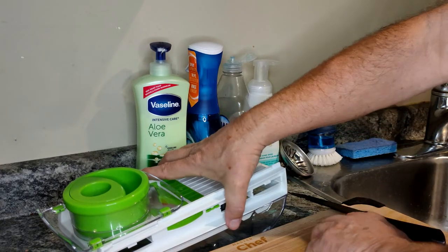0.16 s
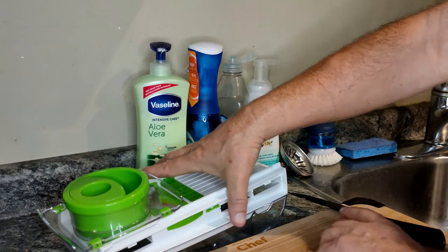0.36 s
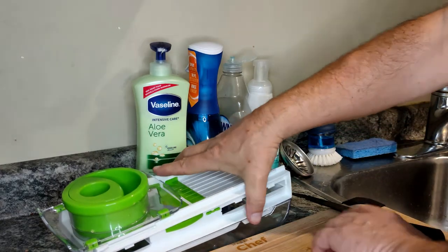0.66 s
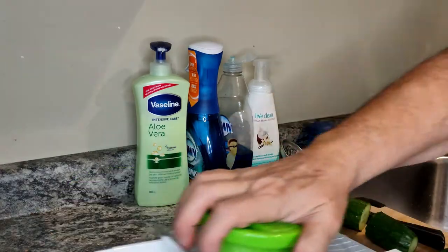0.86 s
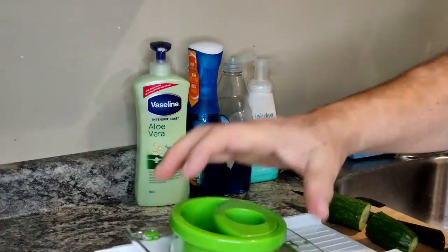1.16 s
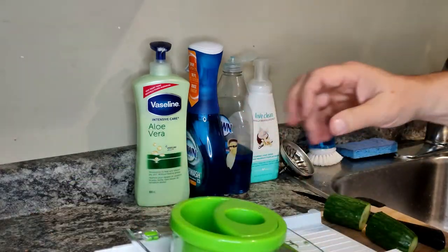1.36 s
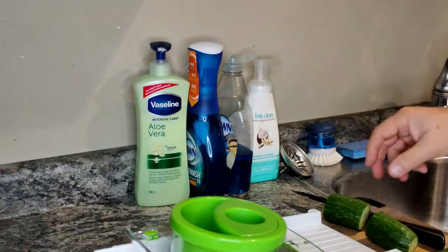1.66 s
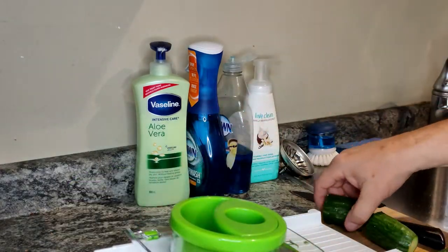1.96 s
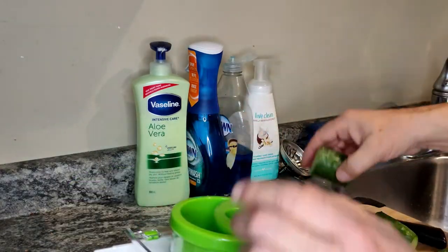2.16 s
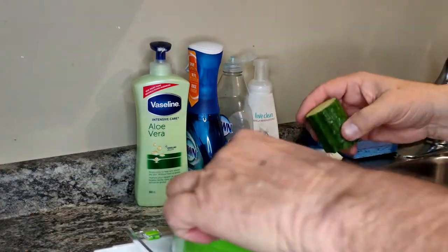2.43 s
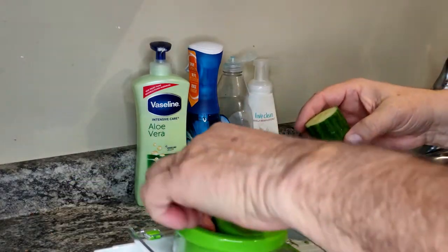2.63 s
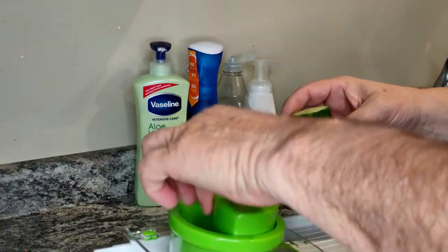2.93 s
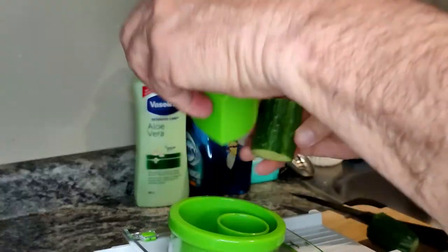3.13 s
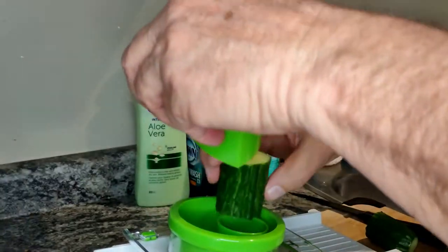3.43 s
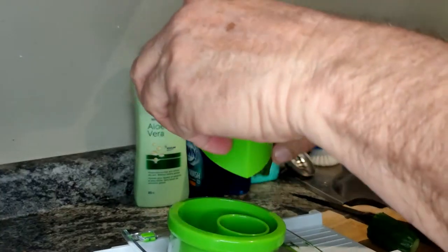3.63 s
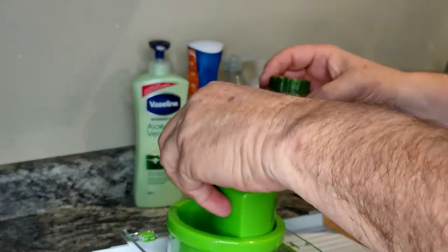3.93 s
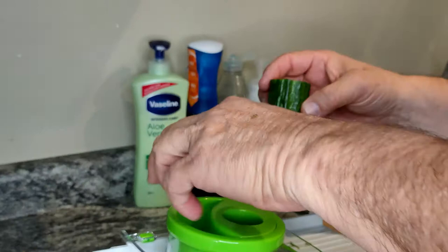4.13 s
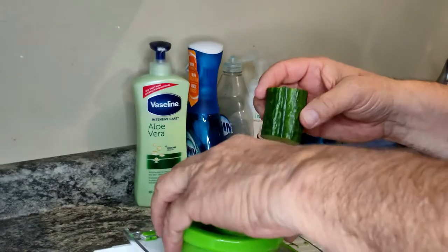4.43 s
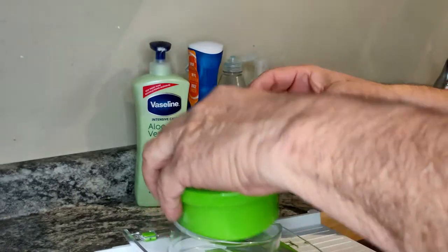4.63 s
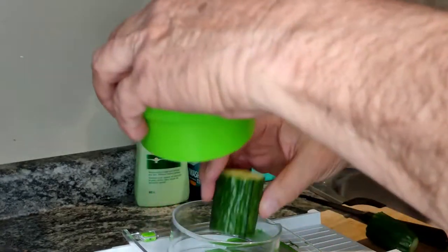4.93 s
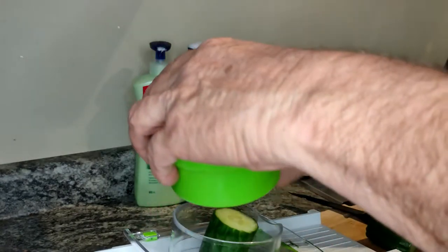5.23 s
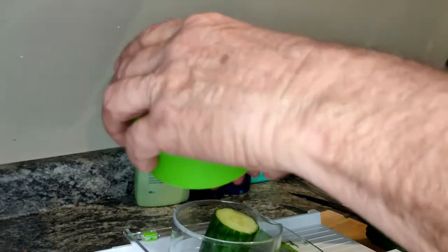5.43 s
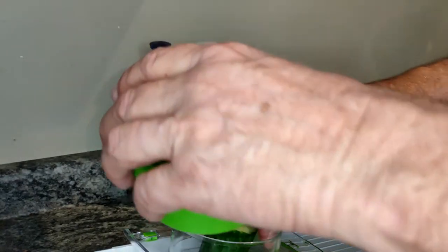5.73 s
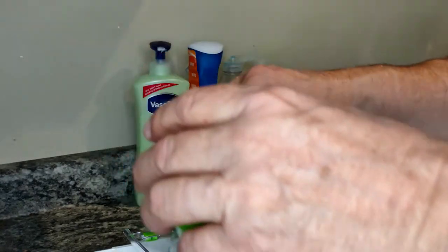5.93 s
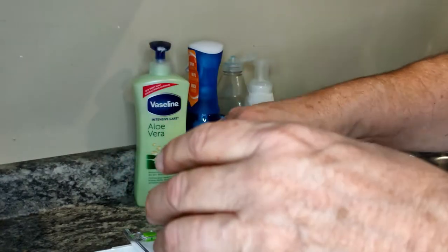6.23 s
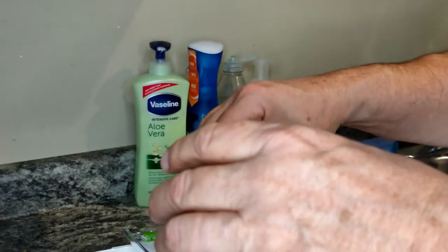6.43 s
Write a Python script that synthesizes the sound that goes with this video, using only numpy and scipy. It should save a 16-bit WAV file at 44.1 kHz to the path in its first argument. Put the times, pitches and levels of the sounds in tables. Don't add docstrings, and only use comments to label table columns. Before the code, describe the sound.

Hands set a plastic slicer on a stone kitchen counter with chattering knocks, then hollow plastic clatters and clicks over a faint refrigerator hum.

```python
import sys
import numpy as np
from scipy import signal
from scipy.fft import rfft, irfft, next_fast_len
from scipy.io import wavfile
from scipy.ndimage import uniform_filter1d

SR = 44100
rng = np.random.default_rng(int(sys.argv[2]) if len(sys.argv) > 2 else 0)


def dump(signal):
    limited = np.clip(np.atleast_2d(signal).T, -1, 1)
    pcm = np.round(limited * 32767).astype(np.int16)
    wavfile.write(sys.argv[1], SR, pcm)


def how_loud(loudness_db):
    steps = np.asarray(loudness_db, float) / 20
    return 10 ** steps


N = 290178

# motor_multiple, level_db
HUM = [(4, -84.5), (5, -58.5), (6, -57.5), (7, -65), (9, -83.5), (10, -77), (16, -79)]
MOTOR_HZ = 59.13
# pitch_hz, width_hz, level_db
WHINES = [(230.3, 11, -66.5), (1670, 30, -90.5), (2200, 8, -85.5), (4199, 1.5, -76)]
# freq_hz, level_db_per_hz
AIR = [(15, -58.5), (25, -40), (144, -11.5), (246, -6), (354, -4), (474, -4.5), (1110, -21), (1190, -34),
       (3740, -30), (4130, -26), (4890, -39.5), (6710, -31), (7580, -31.5), (8350, -63.5), (10900, -86),
       (18400, -120)]
AIR_DB = -61.5
# freq_hz, t60_s
KITCHEN = [(100, 0.23), (400, 0.46), (1000, 0.52), (3000, 0.47), (8000, 0.36)]

# time_s, speed_db, weight_on_plastic_db
HAND_MOVES = [(0.0, -54.5, 13.5), (0.18, -53, -6), (0.42, -62, -0.5), (0.62, -57, -1), (0.95, -39.5, 2.5),
              (1.37, -60, 4.5), (1.55, -62, -1), (1.8, -55.5, 0), (2.35, -65.5, 0.5), (2.78, -58, 4),
              (3.4, -58.5, -5), (4.0, -63, 0.5), (4.2, -49, 0), (4.58, -56, -3.5), (5.06, -53, -2),
              (5.38, -61, 0), (5.74, -60, -0.5), (6.2, -67.5, 3)]
# freq_hz, level_db_per_hz
SKIN = [(2060, -43), (3500, -15.5), (4050, -12.5), (5200, -11), (6550, -2.5), (7610, -13), (8200, -28),
        (10700, -57), (18000, -120)]
# freq_hz, level_db_per_hz
SCRAPE = [(290, -22), (500, -0.5), (919, -3.5), (994, 0), (1410, -5), (2250, -9.5), (2800, -12),
          (4000, -21), (5200, -39.5), (8800, -120)]
# start_s, length_s, level_db
BRUSHES = [(0.088, 0.052, -58.5), (0.517, 0.023, -64), (5.004, 0.21, -67), (5.484, 0.25, -61),
           (6.563, .06, -65.5)]
BRUSH_EDGE_S = 0.024
# pitch_hz, width_hz, level_db
RUB_RINGS = [(1440, 190, -62), (2190, 110, -66.5)]
RUB_S, RUB_HALF_S = 5.06, 0.23
RUMBLE_DB, RUMBLE_FOLLOWS = -64.5, 0.66
RATTLE_DB, RATTLE_S, SHAKE_DB, SHAKE_S = -17, 0.016, -7, 0.018

# crest_s, peak_db, pitch_hz
THUMPS = [(0.25, -44.5, 92.8), (0.611, -45.5, 126.7), (0.755, -21, 95), (0.811, -23, 104),
          (0.883, -38, 93.6), (0.946, -36, 95), (0.997, -27, 100), (1.056, -35, 160), (1.15, -41, 162),
          (1.291, -43, 133), (1.678, -38, 131), (1.742, -37, 84), (1.025, -31, 155), (2.146, -34, 104),
          (2.185, -38, 135), (2.683, -45, 150), (2.871, -42.5, 152), (3.062, -34.5, 133),
          (3.122, -33.5, 142.6), (3.475, -31, 143.4), (4.69, -41, 215), (4.084, -35, 95), (4.058, -29, 128),
          (4.122, -32, 140), (4.269, -32.5, 141.8), (4.297, -37, 145), (4.537, -40.5, 118),
          (4.655, -38, 145), (4.756, -38, 135), (5.186, -48, 162), (0.2, -40.5, 86), (0.8, -37.5, 187.5),
          (1.19, -36, 158), (0.842, -33, 91), (4.045, -36, 215), (3.093, -36, 131)]
# crest_s, peak_db
JOLTS = [(0.351, -42), (0.759, -46), (1.3, -51), (1.759, -46), (2.061, -46), (3.479, -44), (2.26, -48),
         (5.36, -46), (6.26, -54)]
JOLT_HZ = 61
# crest_s, peak_db
CAVITY_BOOMS = [(0.817, -28), (0.797, -23), (0.842, -34), (0.879, -39), (1.722, -31), (1.793, -33),
                (1.825, -32), (5.17, -50), (3.062, -21), (3.133, -33), (3.167, -38.5), (3.47, -28.5),
                (3.493, -32), (4.035, -20.5), (4.066, -26), (3.079, -27), (4.126, -26.5), (4.258, -31),
                (4.297, -24), (4.645, -35), (4.664, -34.5), (4.773, -24), (2.612, -43), (2.68, -40),
                (3.053, -27.5), (3.112, -41.5), (3.533, -40.5), (4.756, -29), (4.835, -44), (4.705, -40),
                (4.228, -33), (4.281, -23), (4.11, -36.5)]
CAVITY_HZ = 584
CAVITY_SWELL_S, THUMP_SWELL_S = 0.011, 0.01325

# start_s, level_db, hardness_db (body to edges), fade_s
FRAME_KNOCKS = [(0.11, -45, 3, 0.02), (0.203, -50, 8.5, 0.015), (0.331, -53.5, -9, 0.011),
                (0.6, -58, -8, 0.032), (0.744, -29, 2, 0.018), (0.7895, -22.5, 2.5, 0.011),
                (0.7975, -18.5, 1.5, 0.0089), (0.813, -35, -8, .014), (0.84, -59.5, -1, 0.021),
                (0.93, -39.5, 0, 0.024), (0.984, -22, 5.5, 0.013), (1.02, -34.5, 0.5, 0.07),
                (1.05, -40.5, 1.5, 0.0084), (1.115, -36.5, 2.5, 0.011), (1.175, -38, 4, 0.011),
                (1.205, -32.5, 3.5, 0.016), (0.99, -35.5, 1, 0.0095), (1.243, -36.5, 0.5, 0.009),
                (1.252, -34.5, 8, 0.0078)]
# start_s, level_db, hardness_db, fade_s
BOARD_KNOCKS = [(1.645, -41.5, -1, 0.014), (1.669, -37.5, -4, 0.012), (1.7095, -33.5, -3, 0.011),
                (1.719, -35, 5, 0.016), (1.784, -37, -1, 0.014), (1.816, -35.5, -5, 0.01),
                (1.931, -49, 7.5, 0.0073), (2.036, -56, 5, 0.059), (2.111, -36, -9.5, 0.004),
                (2.121, -42, -8, 0.024), (2.59, -58.5, -10, 0.019), (2.66, -45, 3.5, 0.015),
                (2.783, -67.5, -6, 0.035), (2.806, -58.5, -13, 0.0033), (2.861, -47, -1, 0.017),
                (3.0468, -27, -0.5, 0.021), (3.057, -47.5, -10, 0.022), (3.084, -32, 8, 0.009),
                (3.09, -29, -1, 0.014), (3.116, -46, -2, 0.024), (3.164, -47.5, -9.5, 0.0065)]
# start_s, level_db, hardness_db, fade_s
CUP_KNOCKS = [(3.456, -26.5, 3.5, 0.012), (3.463, -38.5, -3, 0.046), (4.004, -28.5, 2, 0.017),
              (4.0305, -22, 3, 0.017), (4.045, -36.5, 7.5, 0.0022), (4.056, -31, 4.5, 0.018),
              (4.075, -36, 0.5, 0.013), (4.175, -50, 8.5, 0.024), (4.218, -40, 4.5, 0.067),
              (4.252, -30, 6, 0.016), (4.262, -23, 4, 0.014), (4.302, -48, 6, .014),
              (4.449, -52, 14.5, 0.009), (4.5165, -47, 6, 0.009), (4.638, -39.5, -4, 0.011),
              (4.662, -41.5, -1.5, 0.036), (4.745, -33, 0, 0.016), (5.162, -52, 6, 0.014),
              (5.889, -60, -1, 0.0096), (5.95, -59.5, -4, 0.015), (6.523, -67, -11, 0.0045)]
# start_s, level_db, hardness_db, fade_s
MORE_KNOCKS = [(0.198, -55.5, -4.5, 0.013), (0.334, -50, 5, 0.013), (0.111, -44.5, 1.5, 0.0044),
               (4.4525, -52, 12, .004), (4.745, -38, -2, .003), (0.736, -35, 2, 0.02), (0.76, -38.5, -4.5, .02),
               (1.012, -37.5, 7, 0.0071), (1.08, -41.5, -3.5, .015), (2.596, -54.5, 0, 0.0064),
               (2.673, -47, -1.5, 0.012), (2.78, -57.5, -6.5, 0.0097), (3.103, -33, -0.5, 0.011),
               (3.452, -51, 3, 0.0042), (4.037, -36.5, 4, 0.016), (4.05, -26.5, 3, 0.0086),
               (4.082, -41, -1.5, .008), (4.125, -41.5, -3.5, 0.0059), (4.2165, -45, 11.5, 0.0039),
               (4.269, -30, 3, 0.0069), (4.524, -43.5, 1.5, 0.005), (4.62, -53.5, 2.5, .012),
               (6.0, -72, 3, 0.019)]
# start_s, level_db, hardness_db, fade_s
SLIDES = [(0.66, -54.5, -0.5, 0.032), (0.735, -37.5, 5, 0.1), (0.978, -41.5, 9, 0.0023),
          (1.614, -53.5, -8.5, 0.0099), (2.145, -50, -11, 0.039), (2.573, -55, -1.5, .022),
          (3.025, -48, 2.5, 0.011), (3.5, -43, 2.5, 0.04), (4.103, -32.5, 1.5, .016),
          (4.621, -49, -1.5, 0.052), (4.82, -73.5, 19, 0.0083), (6.25, -60.5, 5.5, 0.0343)]
KNOCK_RISE_S, SLIDE_RISE_S = 0.0022, 0.0072
# low_hz, high_hz
BANDS = [(500, 1500), (1500, 4000), (4000, 9000)]
# pitch_hz, width_hz, level_db
FRAME = [(830, 170, -11), (1530, 370, 12), (1950, 670, -16), (3410, 270, 0), (3590, 230, -19),
         (4920, 82, -14), (4700, 120, -13), (5200, 38, -4), (7000, 21, 0.5), (6240, 16, -2.5),
         (6600, 70, -7.5), (6610, 66, 7.5), (7050, 48, 5)]
# pitch_hz, width_hz, level_db
RAILS = [(593, 34, -2.5), (904, 68, 9), (1230, 9.2, -3.5), (1650, 370, 1), (3420, 290, -9.5),
         (5100, 50, -13), (6150, 110, -32.5), (6550, 110, 9.5), (7130, 69, -0.5), (7270, 38, -2)]
# pitch_hz, width_hz, level_db
BOARD = [(747, 130, 6.5), (1200, 83, -6), (1550, 120, -3), (3470, 89, -41), (4660, 38, -27),
         (4750, 29, -20), (5860, 105, -16), (6520, 65, -14)]
# pitch_hz, width_hz, level_db
RIM = [(1500, 320, -4), (2106, 47, -3), (3620, 680, 17.5), (5100, 130, -39), (5050, 31, 4), (6600, 90, -5),
       (6490, 100, 14), (6900, 72, -3.5), (7500, 29, -3.5), (7250, 47, -5)]
# pitch_hz, width_hz, level_db
PUSHER = [(1228, 98, -13.5), (1375, 84, 3.5), (2304, 63, -12.5), (2600, 37, -1.5), (3270, 32, -7),
          (3620, 26, -3), (3760, 150, -7.5), (5230, 87, -16), (6650, 73, -21), (6810, 38, -5)]
# pitch_hz, width_hz, level_db
CUP = [(780, 14, -4), (942, 22, -1), (1690, 340, 5.5), (2670, 220, -6.5), (3300, 36, -17), (3700, 53, -15),
       (4900, 310, -16.5), (4810, 13, -1), (5400, 58, -7), (6370, 48, 1.5), (6870, 37, 0.5), (6940, 140, 2),
       (7200, 33, -11.5)]
# pitch_hz, width_hz, level_db
LID = [(870, 170, 0), (1690, 30, -30), (2150, 240, 1.5), (3160, 420, 2), (3450, 33, -15.5), (5230, 81, 4.5),
       (6600, 86, -3), (6460, 86, -8.5), (6570, 72, 10.5), (7260, 42, 5.5)]
# from_s, part_resonances, walls_above_body_and_edges_db
STRUCK = [
    (0, FRAME, 1.5),
    (1.5, RAILS, 1.5),
    (2.1, BOARD, 2),
    (2.4, RIM, 0),
    (3.3, PUSHER, 3),
    (3.8, CUP, 3.5),
    (4.6, LID, 1),
]
# start_s, peak_db, pitch_hz, t60_s
PINGS = [(0.111, -38, 997, .03), (0.331, -35, 900, .04), (0.334, -38.5, 6700, .05), (0.668, -47, 4900, .06),
         (0.806, -23.5, 1006, .06), (0.885, -39, 1380, .04), (1.206, -26, 1820, .04),
         (1.252, -37, 4750, .02), (1.669, -31, 1585, .04), (1.71, -30, 790, .06), (1.67, -36, 800, .06),
         (1.82, -32, 1150, .05), (4.665, -33, 700, .05), (3.083, -27, 3700, .05), (5.2, -52, 620, .05),
         (1.722, -27, 6460, .04), (1.784, -27.5, 1550, .04), (2.112, -26, 744, 0.06),
         (2.112, -35, 1227, 0.069), (2.118, -47, 1570, .12), (2.152, -34, 730, 0.067),
         (2.135, -36, 620, .05), (2.165, -41, 945, .06), (2.673, -40, 1500, .05), (2.674, -39, 1710, .05),
         (2.806, -42, 1290, .02), (2.864, -41, 1177, .08), (3.023, -42, 1800, .06), (3.048, -20, 690, .05),
         (3.09, -26, 2007, .04),
         (4.2575, -20, 1800, .04), (4.268, -19, 2000, .03), (3.475, -33, 2560, .09),
             (3.456, -23, 2490, .03), (3.457, -19.5, 2190, .04), (3.465, -23.5, 690, .05),
             (3.474, -28.5, 1454, .08), (4.004, -14, 2123, .04), (4.007, -27.5, 1080, 0.078),
             (4.03, -23.5, 1060, .06), (4.052, -21.5, 966, .08), (4.08, -28.5, 1880, 0.065),
             (4.452, -36, 4900, 0.039), (4.5205, -27, 6550, 0.04), (4.8, -43, 6600, .08),
             (0.79, -25.5, 1095, .04), (0.84, -30.5, 1000, 0.058), (1.05, -38, 1500, .04),
             (3.5, -39, 2200, .1), (3.469, -42.5, 3300, 0.1), (4.004, -25, 5950, .04),
             (4.044, -22.5, 2740, .04), (4.2535, -16, 1778, .07), (4.255, -16, 4650, .035),
             (4.521, -31.5, 2050, .05), (4.528, -34.5, 650, .05), (4.64, -31, 1370, .04),
             (4.747, -28, 2150, .05), (4.76, -33, 900, .07), (4.83, -43, 680, 0.046),
             (5.889, -45.5, 960, .08), (5.889, -48, 1630, .06), (6.523, -50, 1200, .05)]
PING_RISE_S = 0.0013
# start_s, peak_db, pitch_hz
SNAPS = [(0.797, -7, 6800), (0.9843, -15, 6300), (1.1158, -24, 3000), (1.2056, -25, 2200),
         (1.7836, -23, 2000), (3.0817, -9, 6500), (3.4565, -18, 6800), (4.0304, -9, 3300),
         (4.0334, -13, 6800), (4.1037, -26, 6900), (4.2185, -28, 5950), (4.2618, -13, 3200),
         (4.2624, -10, 6700), (4.448, -22, 5600), (4.4517, -28, 5200), (4.5201, -21, 6700),
         (4.7464, -23, 6200), (5.1642, -40, 6300)]
SNAP_T60_S = 0.017

# freq_hz, level_db
MICROPHONE = [(7300, 0), (7800, -1), (8100, -7), (8500, -14.5), (9000, -46.5), (11000, -70), (16000, -85)]
# centre_s, share_dropped (0-1)
THINNED = [(0.129, .6), (.29, .5), (.94, .4), (1.145, .4), (2.05, .6), (2.564, .3), (2.63, .3), (2.755, .6),
           (2.82, .6), (3.15, .4), (3.24, .3), (3.49, .25), (1.9, .25), (3.972, .4), (4.056, .5),
           (4.685, .5), (4.725, .6), (5.71, .7), (6.0, .3), (1.29, .3), (4.37, .2), (6.19, .3), (6.264, .8),
           (6.49, .4)]


def evened(x):
    return x / np.sqrt(np.mean(x ** 2) + 1e-20)


def read(points, hz):
    f, value = np.transpose(points)
    return np.interp(np.log(hz + 1), np.log(f + 1), value)


def add(mix, s, sound):
    part = mix[round(s * SR):][:len(sound)]
    part += sound[:len(part)]


def coloured(x, points):
    size = next_fast_len(len(x))
    gain = how_loud(read(points, np.fft.rfftfreq(size, 1 / SR)))
    return evened(irfft(rfft(x, size) * gain, size)[:len(x)])


def fuzzy_line(hz, width_hz, steady):
    r = np.exp(-np.pi * abs(width_hz) / SR)
    noise = rng.standard_normal(N) + 1j * rng.standard_normal(N)
    slow = signal.lfilter([1 - r], [1, -r], noise)
    carrier = np.exp(2j * np.pi * hz * np.arange(N) / SR)
    return evened(((steady + slow / slow.std()) * carrier).real)


def swell(t, crest_s):
    return (t / crest_s * np.exp(1 - t / crest_s)) ** 1.4


def settling(x, fade_s):
    r = np.exp(-1 / (SR * fade_s))
    return np.sqrt(abs(signal.lfilter([1 - r], [1, -r], x ** 2)))


def refrigerator():
    turn = 2 * np.pi * MOTOR_HZ * np.arange(N) / SR
    waver = evened(uniform_filter1d(rng.standard_normal((len(HUM), N)), size=6000, axis=1))
    sound = how_loud(AIR_DB) * coloured(rng.standard_normal(N), AIR)
    for (multiple, db), w in zip(HUM, waver):
        sound += np.sqrt(2) * how_loud(db + 1.1 * w) * np.cos(int(multiple) * turn)
    for hz, width_hz, db in WHINES:
        sound += how_loud(db) * fuzzy_line(hz, width_hz, steady=(hz / 2000) ** 2)
    return sound


def kitchen(x):
    taps = rng.standard_normal(SR // 2)
    taps[:220] = 0
    hz, t, z = signal.stft(taps, SR, nperseg=256)
    decay = how_loud(-60 * t / read(KITCHEN, hz)[:, None])
    tail = signal.istft(z * decay, SR, nperseg=256)[1]
    return signal.fftconvolve(x, tail / np.linalg.norm(tail))[:N]


def hands(knocks, thumps):
    s, *controls = np.transpose(HAND_MOVES)
    t = np.arange(N) / SR
    speed_db, weight_db = (np.interp(t, s, db) for db in controls)
    rattle = how_loud(RATTLE_DB) * settling(knocks, RATTLE_S)
    shake = how_loud(SHAKE_DB) * settling(thumps, SHAKE_S)
    flutter = evened(uniform_filter1d(rng.standard_normal((2, N)), size=600, axis=1))
    slips = rng.standard_normal((2, N)) * how_loud(1.3 * flutter)

    brush = np.zeros(N)
    for start, length, db in BRUSHES:
        inside = np.minimum(t - start, start + length - t)
        brush += how_loud(db) * np.clip(inside / BRUSH_EDGE_S + 1, 0, 1)
    hiss = (how_loud(speed_db - 3.5) + brush + 0.31 * rattle) * coloured(slips[0], SKIN)
    scrape = (how_loud(speed_db + weight_db - 6.5) + rattle) * coloured(slips[1], SCRAPE)

    rings = sum(how_loud(db) * fuzzy_line(hz, width_hz, steady=0) for hz, width_hz, db in RUB_RINGS)
    rings = rings * how_loud(1.76 * flutter[0]) * np.exp(-((t - RUB_S) / RUB_HALF_S) ** 4)

    rumble = coloured(rng.standard_normal(N), [(20, -18.0), (50, -13.0), (100, 0.0), (160, -4.5),
                                               (280, -7.5), (450, -11.5), (800, -64.5)])
    push = how_loud(RUMBLE_DB + RUMBLE_FOLLOWS * (speed_db + weight_db + 57.0))
    return hiss + scrape + rings + (push + shake) * rumble


def thump(row):
    s, peak_db, hz = row
    t = np.arange(SR // 4) / SR
    near, phase = rng.uniform(.6, 2.2, (6, 1)), rng.random((6, 1))
    neighbours = 0.3 / near * np.exp(-25 * near * t) * np.sin(2 * np.pi * (near * hz * t + phase))
    boom = np.sin(2 * np.pi * hz * t) + neighbours.sum(0)
    return s - THUMP_SWELL_S, how_loud(peak_db - 4.5) * swell(t, THUMP_SWELL_S) * boom


def cavity(row):
    s, peak_db = row
    t = np.arange(SR // 6) / SR
    note = np.sin(2 * np.pi * CAVITY_HZ * rng.uniform(0.99, 1.008) * t)
    return s - CAVITY_SWELL_S, how_loud(peak_db - 4.5) * swell(t, CAVITY_SWELL_S) * note


def snap(row):
    s, peak_db, hz = row
    t = np.arange(SR // 40) / SR
    modes = sum(share * np.sin(2 * np.pi * ratio * hz * t) for ratio, share in [(.72, .4), (1, 1), (1.09, .3)])
    return s, how_loud(peak_db - 2.0 - 60 * t / SNAP_T60_S) * modes


def ping(row):
    s, peak_db, hz, t60_s = row
    t = np.arange(SR // 6) / SR
    t60_s = np.clip(t60_s, .005, .09)
    pair = np.sin(2 * np.pi * hz * t) + 0.33 * np.sin(2 * np.pi * 1.045 * hz * t)
    return s, np.minimum(t / PING_RISE_S, 1) * how_loud(peak_db - 0.5 - 60 * t / t60_s) * pair


def knock(row, modes, walls_db, rise_s, filters, damping):
    s, db, hard_db, fade_s = row
    band_db = db - hard_db, db + walls_db - 0.22 * abs(hard_db), db + hard_db
    t = np.arange(4096) / SR
    rise_s = np.clip(rise_s * np.sqrt(fade_s / 0.017), .0002, .02)
    fade_s = np.clip(0.74 * fade_s, .001, .03)

    when, size, hiss = rng.random(4096), rng.standard_normal(4096), rng.standard_normal(4096)
    contacts = np.tanh(size) * (when < 4000 / SR) + 0.26 * hiss
    contacts[0] = 4 * min(KNOCK_RISE_S / rise_s, 1)
    contacts *= np.minimum(t / rise_s + 0.15, 1) * np.exp(-np.maximum(t - rise_s, 0) / fade_s)

    hz, width_hz, mode_db = np.transpose(modes)[:, :, None]
    spot = rng.standard_normal((2, len(modes), 1))
    damped = how_loud(mode_db + 2.0 * spot[0]) * np.exp(-np.pi * damping * (width_hz + 0.013 * hz) * t)
    lasting = how_loud(mode_db - 22.0) * np.exp(-np.pi * (0.91 * width_hz + hz / 160) * t)
    rings = (damped + lasting) * np.sin(2 * np.pi * hz * (1 + 0.017 * spot[1]) * t)

    out = np.zeros(len(t))
    for level_db, (lo_hz, hi_hz), band, crack in zip(band_db, BANDS, filters, [.7, .8, .9]):
        inside = (hz[:, 0] > lo_hz) & (hz[:, 0] <= hi_hz)
        ring = signal.fftconvolve(contacts, rings[inside].sum(0))[:len(t)]
        part = signal.sosfilt(band, evened(ring) + crack * evened(contacts))
        out += how_loud(level_db + 1.0) * part / np.sqrt(uniform_filter1d(part ** 2, size=256).max())
    return s - .0003, out


def scene():
    knocks, thumps, booms = np.zeros((3, N))
    filters = [signal.butter(2, band, "band", fs=SR, output="sos") for band in BANDS]
    for rows, rise_s in [(FRAME_KNOCKS + BOARD_KNOCKS + CUP_KNOCKS, KNOCK_RISE_S), (SLIDES, SLIDE_RISE_S),
                         (MORE_KNOCKS, KNOCK_RISE_S)]:
        for row in rows:
            part, walls_db = [struck[1:] for struck in STRUCK if struck[0] <= row[0]][-1]
            add(knocks, *knock(row, part, walls_db, rise_s, filters, damping=3.8))
    knocks = signal.sosfilt(signal.butter(4, 470, "high", fs=SR, output="sos"), knocks)
    for row in PINGS:
        add(knocks, *ping(row))
    for row in SNAPS:
        add(knocks, *snap(row))
    for row in CAVITY_BOOMS:
        add(booms, *cavity(row))
    for row in THUMPS + [(*jolt, JOLT_HZ) for jolt in JOLTS]:
        add(thumps, *thump(row))
    thumps = signal.sosfilt(signal.butter(3, 60, "high", fs=SR, output="sos"), thumps)
    wet = kitchen(how_loud(-12.0) * knocks + how_loud(-24.0) * booms + how_loud(-6.0) * thumps)
    background = hands(knocks + booms, thumps) + refrigerator()
    return (knocks + booms + thumps + wet + background)[None]


def thin_out(x):
    out, window = x.copy(), np.sqrt(signal.windows.tukey(2048, .7))
    upper = abs(np.fft.rfftfreq(2048, 1 / SR) - 4300) < 3300
    for s, share in THINNED:
        at = slice(round(s * SR) - 1024, round(s * SR) + 1024)
        z = rfft(window * x[at])
        strength = uniform_filter1d(abs(z), size=5) / uniform_filter1d(abs(z), size=60)
        weak = upper & (strength < np.quantile(strength[upper], np.clip(share, 0, .95)))
        gain = np.where(weak, .025, 1 + 0.5 * share * upper)
        out[at] += window * (irfft(z * gain) - window * x[at])
    return out


def top_cut(x):
    return signal.sosfilt(signal.butter(12, 8500, fs=SR, output="sos"), x)


def record(dry):
    hz = np.linspace(0, SR / 2, 513)
    taps = signal.firwin2(301, hz, how_loud(read(MICROPHONE, hz)), fs=SR, window=("kaiser", 8))
    heard = signal.oaconvolve(0.89 * np.tanh(dry / 0.94), taps[None], "same")
    heard = thin_out(heard[0])[None] + how_loud(-99) * rng.standard_normal(dry.shape)
    return top_cut(heard)


dry = scene()
out = record(dry)
dump(out)
```